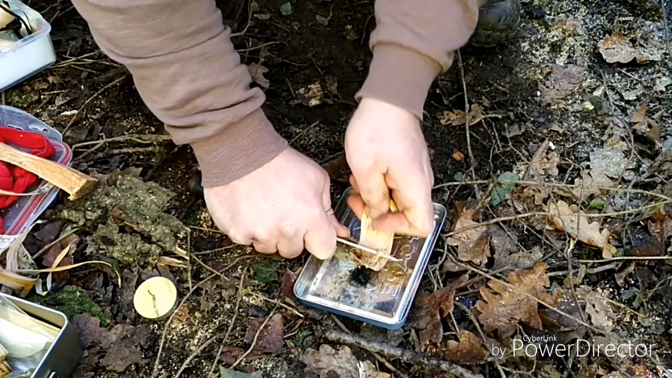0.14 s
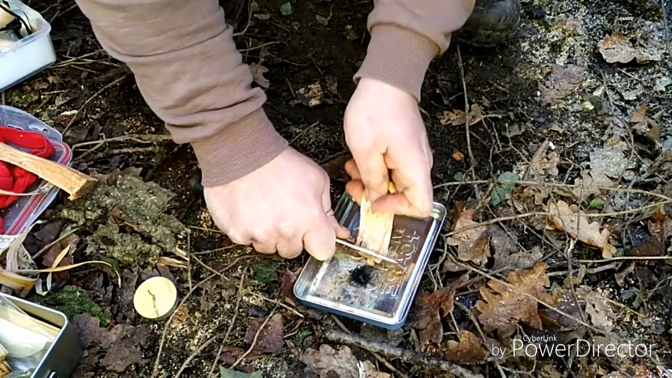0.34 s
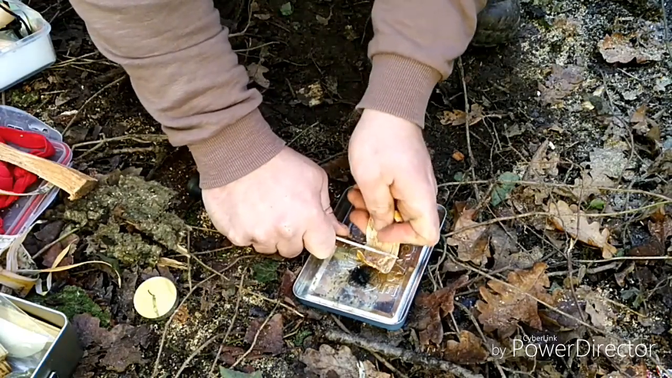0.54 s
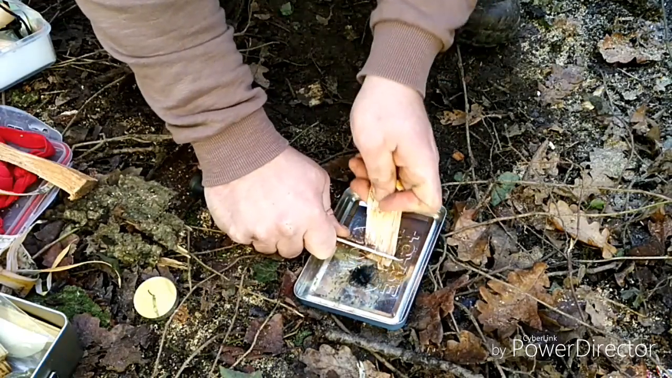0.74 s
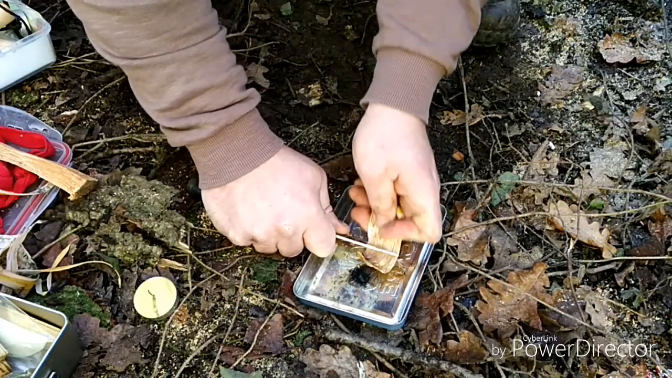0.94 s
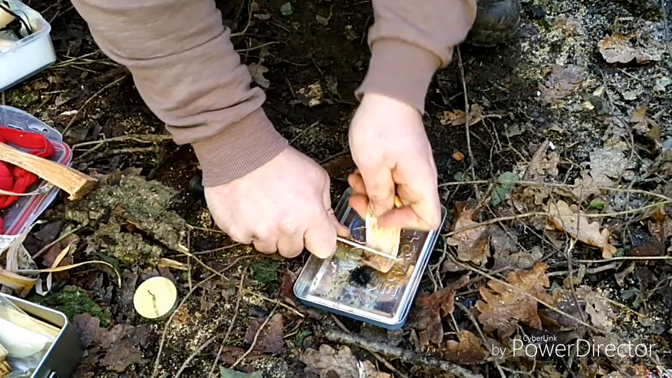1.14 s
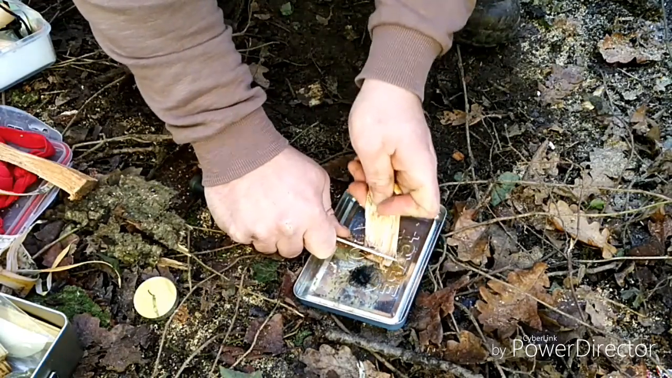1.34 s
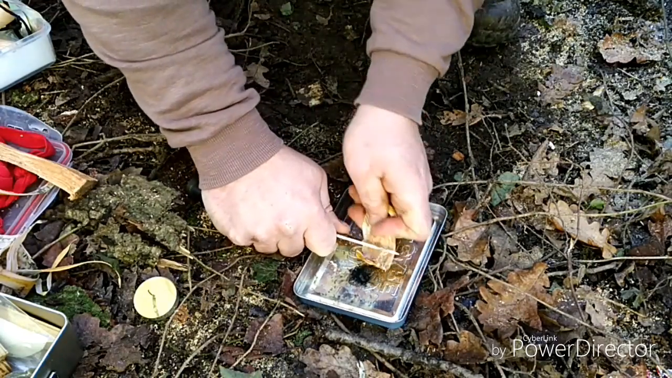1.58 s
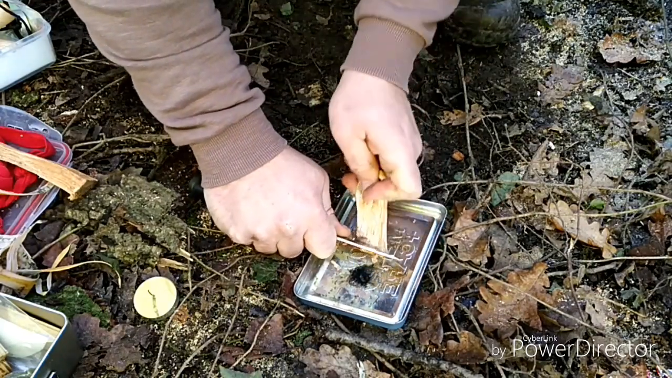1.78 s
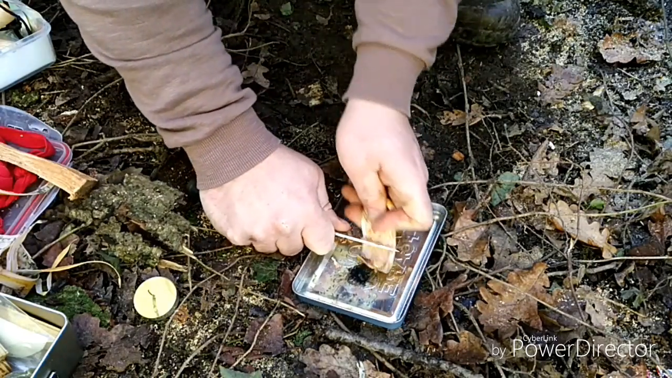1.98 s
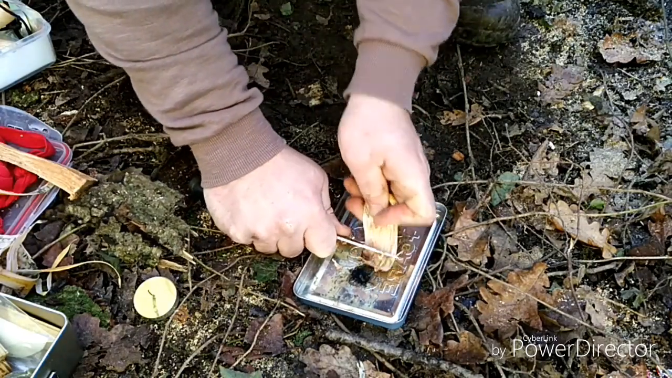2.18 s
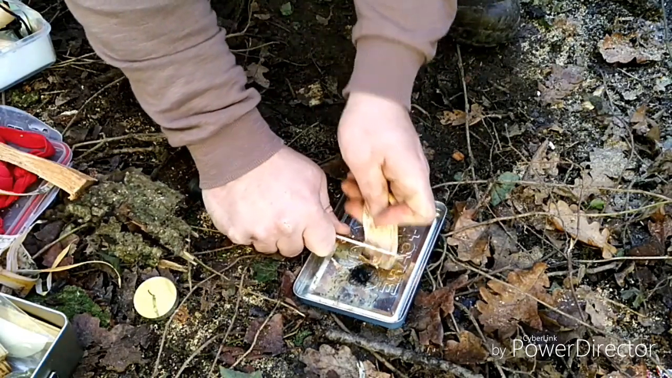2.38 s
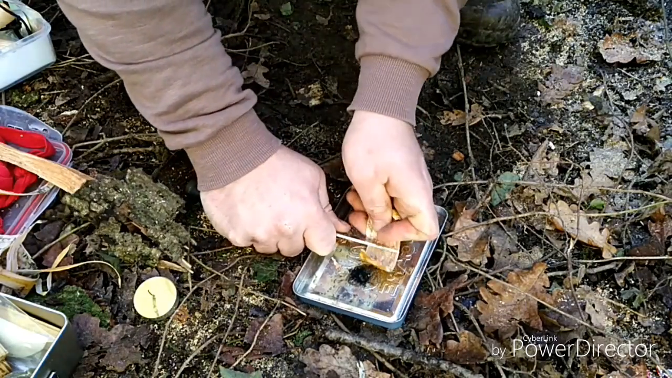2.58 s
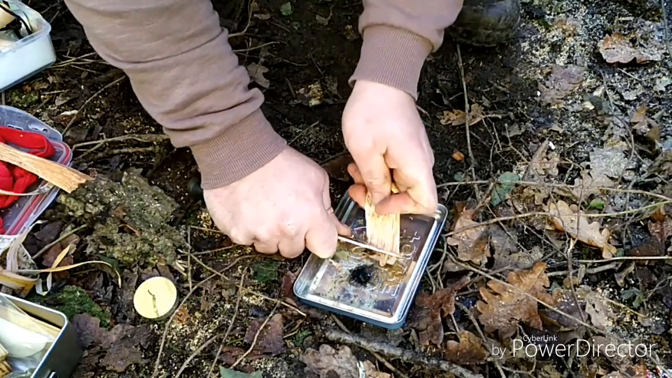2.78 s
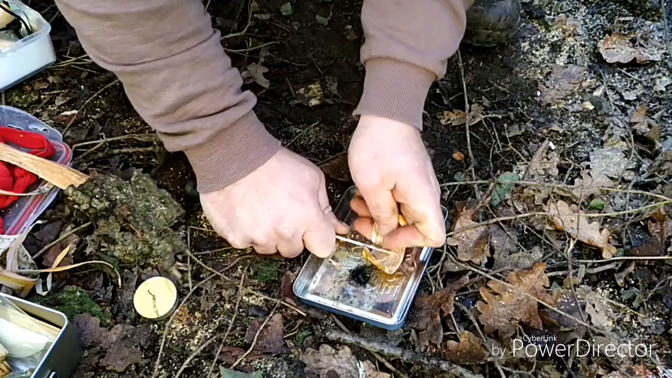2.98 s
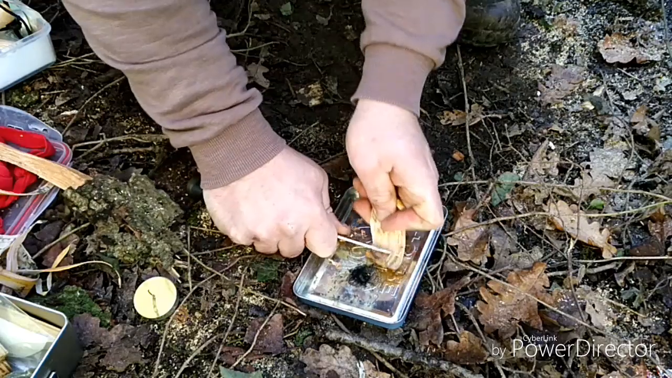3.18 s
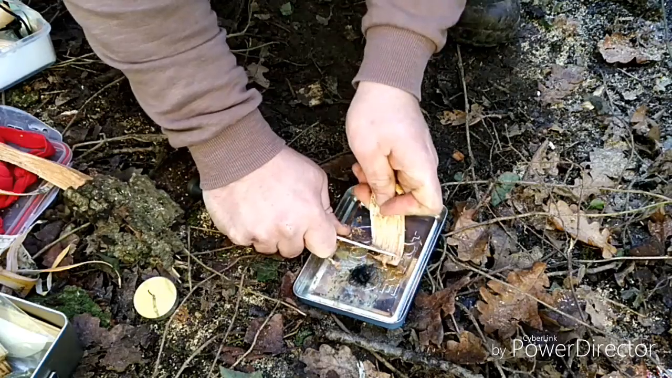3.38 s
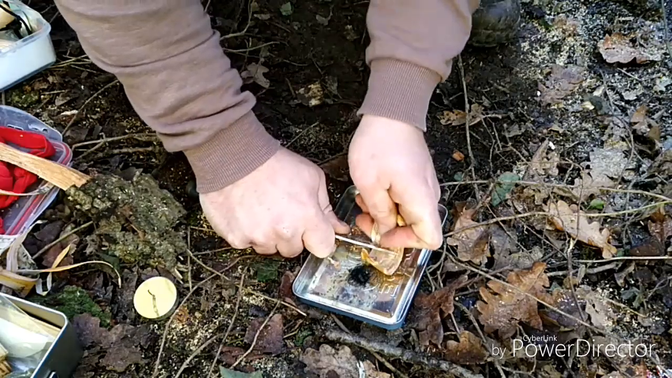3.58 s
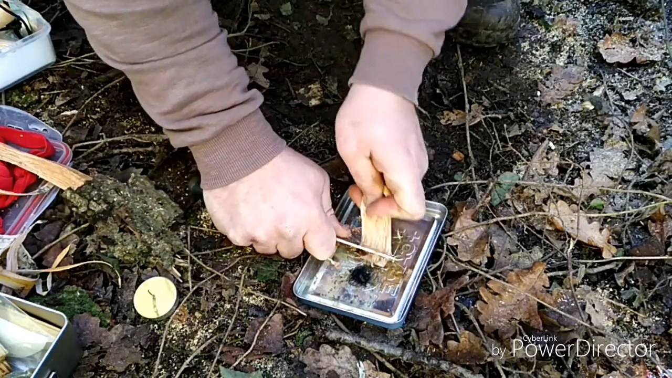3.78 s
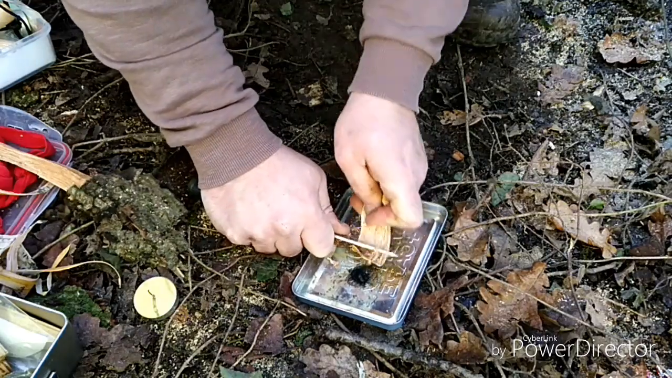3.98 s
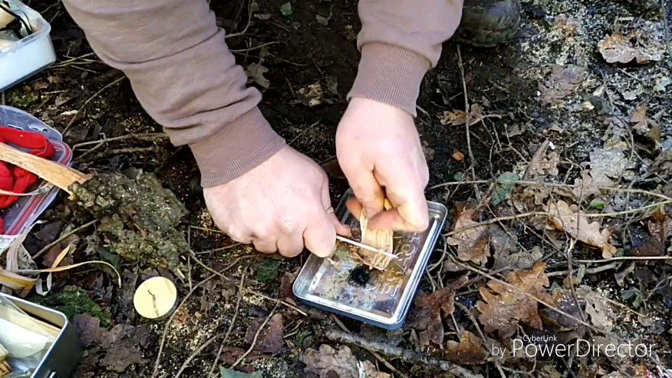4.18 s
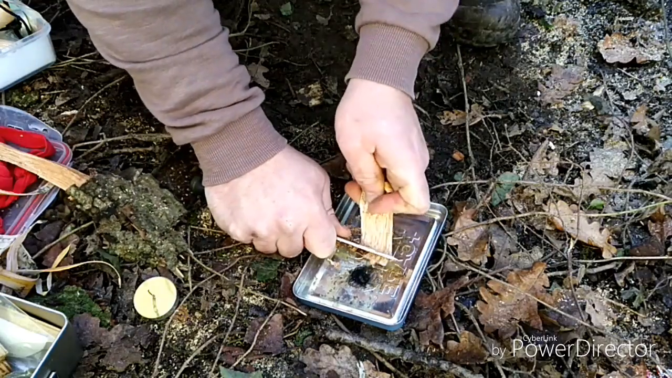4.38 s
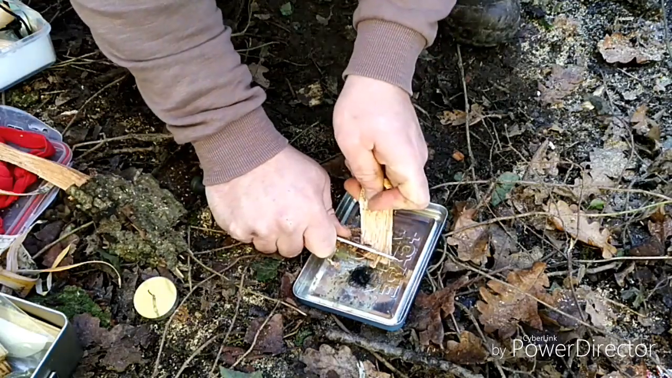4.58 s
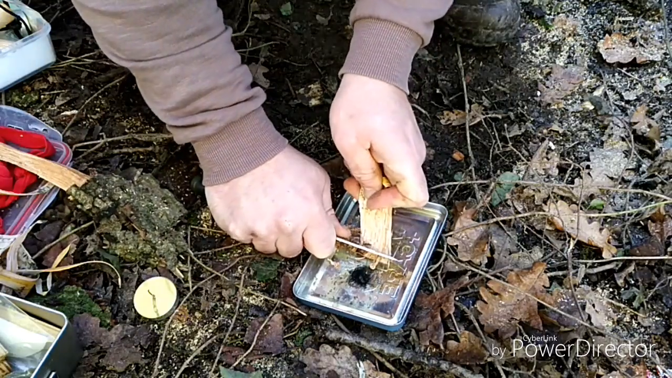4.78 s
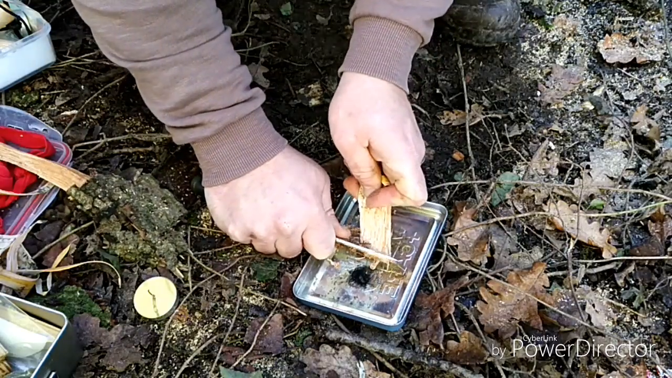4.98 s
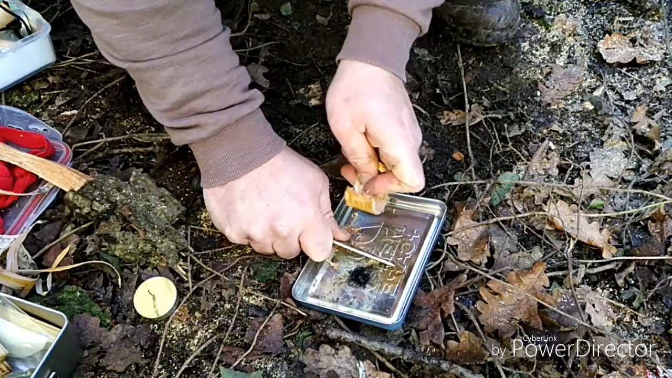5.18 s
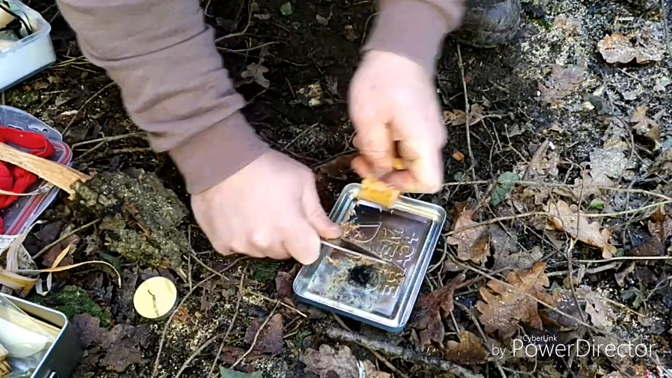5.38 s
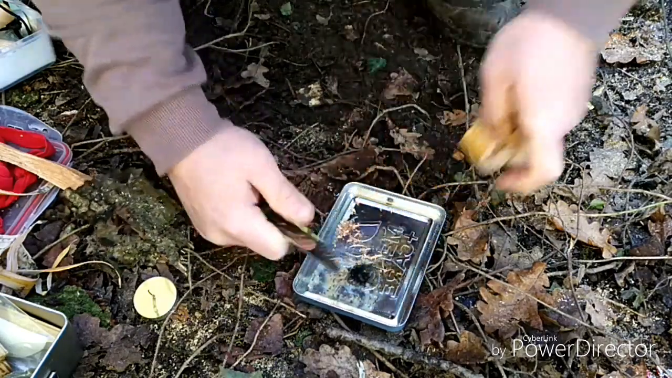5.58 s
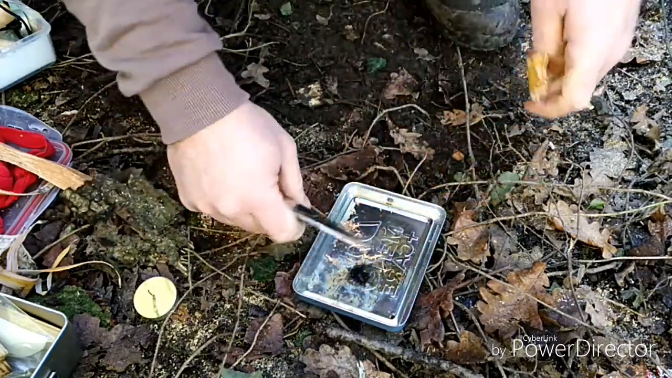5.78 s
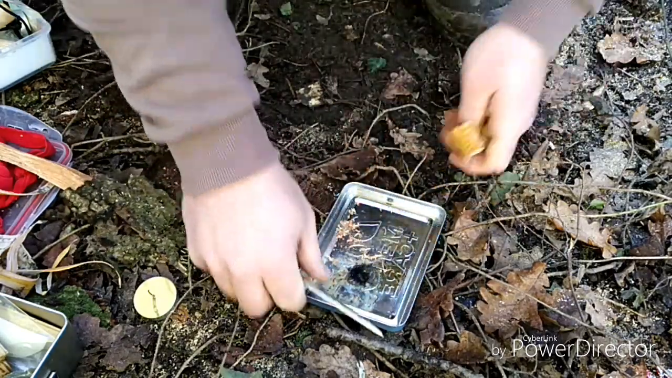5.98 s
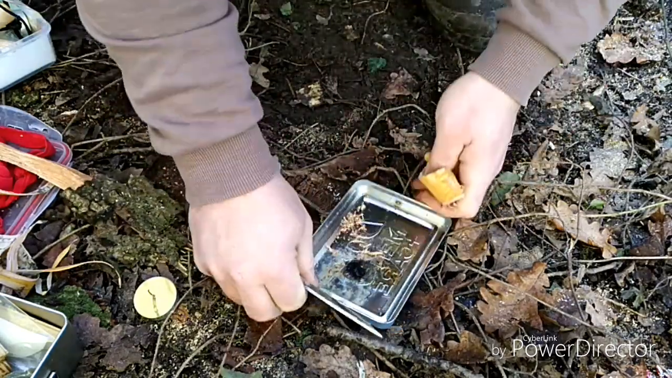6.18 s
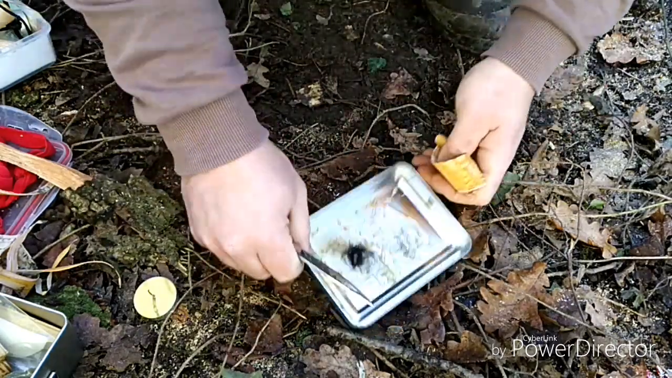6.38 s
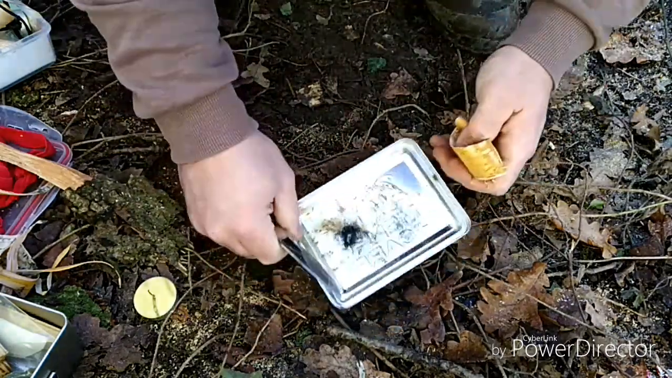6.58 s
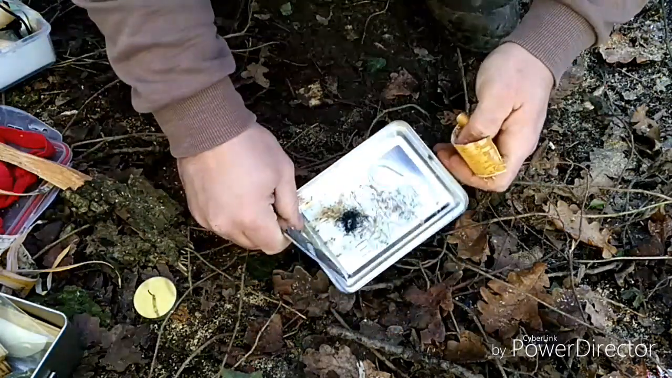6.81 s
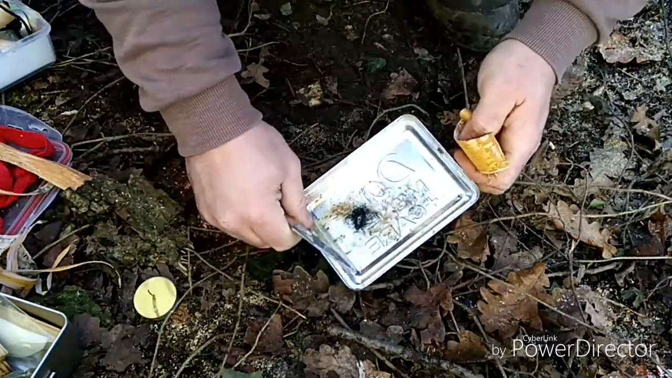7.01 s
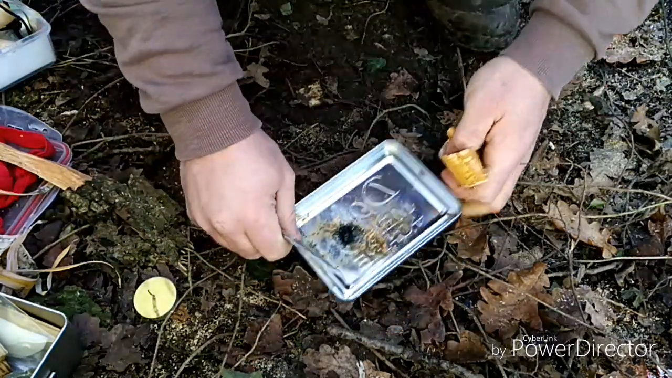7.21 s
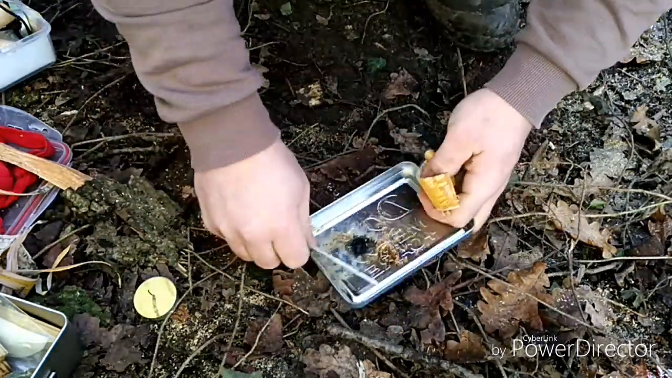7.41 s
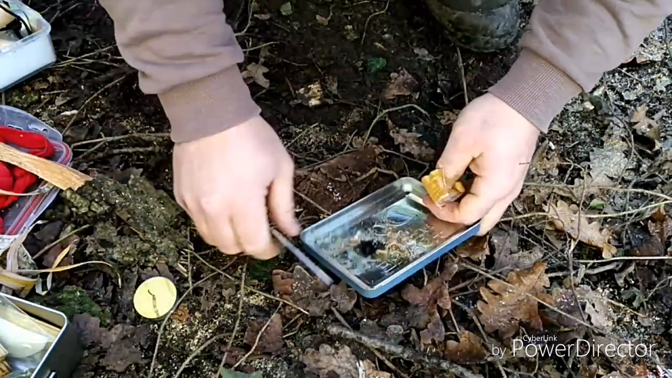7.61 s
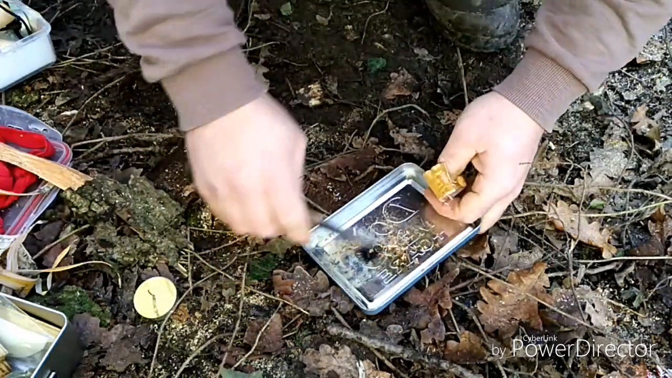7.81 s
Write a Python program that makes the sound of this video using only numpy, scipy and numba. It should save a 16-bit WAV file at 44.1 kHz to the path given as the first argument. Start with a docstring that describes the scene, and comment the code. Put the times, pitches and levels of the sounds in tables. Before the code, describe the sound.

A close, dry stereo pickup on still woodland ground, with very faint hiss and low rumble. From 0 to 4.6 seconds a steel edge is worked along a fire-starting rod: nine pushes about half a second apart, beginning near 0.25. Each is a gritty rasp with stick-slip chatter and a hollow resonance sliding down; the returns hiss more lightly. A sharp catch and knock come at 0.4, a very loud bright clack at 1.57, and the most jagged pushes at about 2.9 and 3.4. Lighter scraping ends near 4.6 with dull bumps. Separate clacks follow at 4.8 and 4.95, then one short scrape at 5.2. Afterwards it is much quieter: patchy dry-leaf rustle, soft tin rubbing and light touches around 6.3, a soil grind at 6.65, a small knock and dull thud at 7.6, then a faint tin touch at 7.7.

```python
"""Fire steel over a tin

A steel edge is worked to and fro along a fire-starting rod, twice a second, over a tin on a woodland floor.
Each push is gritty noise through the steel's resonances, with stick-slip jolts and a hollow resonance sliding
down; the returns and one short late scrape hiss more lightly. Knocks are decaying noise bursts. Later the hands
shift the tin on dry leaves: patchy crackle, grinding, narrow-band rubs and decaying tin modes, over faint air
and hums."""
import sys
import numpy as np
from scipy import signal
from scipy.fft import rfft, irfft
from scipy.io import wavfile
from scipy.ndimage import uniform_filter1d
from numba import njit

SR = 44100
rng = np.random.default_rng(int(sys.argv[2]) if len(sys.argv) > 2 else 0)


def waveform_to_disk(signal):
    """Save audio, clipped to [-1, 1], as 16-bit WAV at the path in sys.argv[1]."""
    frames = np.transpose(np.atleast_2d(signal))
    scaled = np.clip(frames, -1, 1) * 32767
    samples = np.round(scaled).astype(np.int16)
    wavfile.write(sys.argv[1], SR, samples)


N = 346185


def from_db(db):
    """Decibels to amplitude gain."""
    return 10 ** (np.asarray(db) / 20)


def rms_one(x):
    """Scale to unit rms."""
    return x / np.sqrt(np.mean(x ** 2) + 1e-20)


def colour(x, spectrum, peaks=(), unit_power=True):
    """Causal (minimum-phase) filter from a smooth spectrum plus resonance peaks (Hz, width Hz, dB)."""
    size = 4096
    hz = np.fft.rfftfreq(size, 1 / SR) + 1
    at_hz, at_db = np.transpose(spectrum)
    smooth_db = np.interp(np.log(hz), np.log(at_hz), at_db)
    peaks_db = sum(db / (1 + (2 * (hz - centre) / width) ** 2) for centre, width, db in peaks)
    gain = from_db(smooth_db + peaks_db)
    # folding the cepstrum onto positive time gives minimum phase
    cepstrum = irfft(np.log(rms_one(gain) if unit_power else gain))
    cepstrum[1:size // 2] *= 2
    cepstrum[size // 2 + 1:] = 0
    impulse = irfft(np.exp(rfft(cepstrum)))
    return signal.oaconvolve(x, impulse[None], axes=1)[:, :N]


# Stereo width. Each row: frequency in Hz, side level re mid in dB.
SIDE_WIDTH = [(60, -16), (500, -12), (1500, -9), (2500, -8), (3400, -11), (4700, -2), (5600, -6), (6500, 0),
              (7200, -3), (7800, 1), (8700, -4), (15000, -2)]


def noise():
    """Unit-rms stereo noise, nearly alike in both ears in the bass and wide in the treble."""
    mid, side = rng.standard_normal((2, 1, N))
    side = colour(side, SIDE_WIDTH, unit_power=False)
    return rms_one(mid + side * [[1], [-1]])


def wander(per_s):
    """Random curve of spread about 1: straight lines between normal draws."""
    knots = rng.standard_normal(2000)
    return np.interp(np.arange(N) / SR * per_s, np.arange(len(knots)), knots)


def strikes(times_s, gains):
    """One impulse per event."""
    out = np.zeros(N)
    np.add.at(out, (np.asarray(times_s) * SR).astype(int), gains)
    return out


def fade(energy, t60_s):
    """Energy that dies away exponentially."""
    return signal.lfilter([1], [1, -from_db(-120 / (t60_s * SR))], energy + 1e-18)


def burst(times_s, db, crack_t60, tail_t60, tail_db):
    """Envelope of sharp cracks, each with an added tail (t60 in s, tail level re crack)."""
    energy = strikes(times_s, from_db(db) ** 2)
    crack, tail = fade(energy, crack_t60), fade(energy, tail_t60)
    return np.sqrt(crack + from_db(tail_db) ** 2 * tail)


def grit(per_s, spread_db, t60, smooth_db):
    """Unit-rms envelope of tiny fractures of uneven size over smooth friction."""
    sizes = from_db(spread_db * np.clip(rng.standard_normal(N), -2, 2))
    fractures = rng.random(N) < per_s / SR
    energy = fade(fractures * sizes ** 2, t60)
    return rms_one(np.sqrt(energy / energy.mean() + from_db(smooth_db) ** 2))


@njit
def sliding_resonance(x, hz, q):
    """State-variable band-pass with a moving centre; noise keeps its power."""
    out, low, band = np.zeros(len(x)), 0., 0.
    for i in range(len(x)):
        step = 2 * np.sin(np.pi * hz[i] / SR)
        low += step * band
        band += step * (x[i] - low - band / q)
        out[i] = band / np.sqrt(q * hz[i] * np.pi / SR)
    return out


def resonate(x, hz, q):
    """Both channels through one moving resonance."""
    hz = np.clip(hz, 200, 10000)
    return np.array([sliding_resonance(channel, hz, q) for channel in x])


LIFT_S = 0.0076  # contact ramp just outside each span


def swell(t, start, peak, end, depth_db, rise_power, fall_power):
    """Gain of one hand movement: rises to 1, eases to -depth_db at its ends, then lifts off to silence."""
    rise = np.clip((peak - t) / (peak - start), 0, 1)
    fall = np.clip((t - peak) / (end - peak), 0, 1)
    contact = np.clip(1 + np.minimum(t - start, end - t) / LIFT_S, 0, 1)
    return contact * from_db(-depth_db * (rise ** rise_power + fall ** fall_power))


def swells(rows, column, depth_db, rise_power, fall_power):
    """Envelope of a table of movements, each at the level in the given column."""
    out = np.zeros(N)
    for row in rows:
        first = max(int((row[0] - LIFT_S) * SR), 0)
        last = min(int((row[2] + LIFT_S) * SR), N)
        at = np.arange(first, last)
        out[at] += from_db(row[column]) * swell(at / SR, *row[:3], depth_db, rise_power, fall_power)
    return out


# Air hiss spectrum. Each row: frequency in Hz, relative density in dB.
AIR_SPECTRUM = [(120, -20.5), (200, -1), (249, 4), (548, -4), (777, -3), (1560, -9.5), (3070, -8),
                (4600, -11.5), (6640, -5.5), (7830, -7), (9230, -8.5), (10500, -11.5), (14900, -10.5),
                (16000, -21.5)]
# Low rumble spectrum, also shapes the shudder. Each row: frequency in Hz, relative density in dB.
RUMBLE_SPECTRUM = [(12, -71), (20, -36), (24, -25), (35, -21), (64, 3), (118, -2.5), (145, -4), (195, -10),
                   (236, -12.5), (300, -22.5), (390, -51), (660, -120)]
# Low hums. Each row: start in seconds, end in seconds, mean frequency in Hz, nominal peak level in dB.
LOW_HUMS = [(0.02, 0.41, 73, -49), (1.201, 5.6, 158, -64), (5.5, 6.3, 118, -56)]
AIR_DB, RUMBLE_DB = -59, -57


def woodland():
    """Still air: faint hiss over a far rumble; sine hums swell and fade, wavering in pitch and level."""
    hiss = from_db(AIR_DB) * colour(noise(), AIR_SPECTRUM)
    rumble = from_db(RUMBLE_DB) * colour(noise(), RUMBLE_SPECTRUM)
    out = hiss + rumble
    t = np.arange(N) / SR
    for start, end, hz, db in LOW_HUMS:
        arch = np.sin(np.pi * np.clip((t - start) / (end - start), 0, 1))
        level = from_db(db + 3 * wander(18))
        phase = 2 * np.pi * np.cumsum(hz * (1 + .04 * wander(20))) / SR
        out = out + level * arch * np.sin(phase)
    return out


def hollow(envelope, top_hz, low_hz, bottom_hz, q, overtone_db):
    """The resonance falls as the contact travels out on a push and climbs again on a light stroke."""
    path = [(0, bottom_hz), (4.6, bottom_hz)]
    for start, peak, end, *_, middle_hz in PUSH_STROKES:
        path += zip((start, peak, (peak + end) / 2, end), (top_hz, middle_hz, low_hz, bottom_hz))
    for start, _, end, *_ in LIGHT_STROKES:
        path += zip(np.linspace(start, end, 4), (bottom_hz, low_hz, top_hz, top_hz))
    hz = np.interp(np.arange(N) / SR, *np.transpose(sorted(path)))
    wobble = np.exp(.06 * wander(60))
    hz = np.maximum(hz * wobble, 470)
    drive = envelope * noise()
    overtones = resonate(drive, hz * 1.577, 9.4) - from_db(-3.5) * resonate(drive, hz * 2.04, 5.9)
    ringing = resonate(drive, hz, q) - from_db(overtone_db) * overtones
    band = signal.butter(4, [390, 2600], "band", fs=SR, output="sos")
    return signal.sosfilt(band, ringing)


PUSH_DEPTH_DB, PUSH_RISE_POWER, PUSH_FALL_POWER = 19, 2.5, 1.22
CHATTER_FOLLOWS = 1.01  # dB per dB of pressure
CHATTER_SLOWING_PER_S, CHATTER_JITTER, CHATTER_SPREAD_DB = 2.2, 0.104, 2


def chatter(hollow_db):
    """Stick-slip jolts follow the pressure and slow along a push; a hard catch restarts the cycle."""
    slips, catches = [], np.array(HARD_CATCHES)[:, 0]
    for start, peak, end, _, _, db, gap_s, _ in PUSH_STROKES:
        s = start
        for early, strong in rng.standard_normal((60, 2)):
            gap = gap_s * np.exp(CHATTER_SLOWING_PER_S * (s - peak) + CHATTER_JITTER * early)
            ahead = catches[(catches > s) & (catches < s + 1.6 * gap)]
            s = ahead.min() if len(ahead) else s + gap
            if s > end:
                break
            if not len(ahead):
                pressure = swell(s, start, peak, end, PUSH_DEPTH_DB, PUSH_RISE_POWER, PUSH_FALL_POWER)
                pressure_db = 20 * np.log10(pressure)
                slip_db = db + CHATTER_FOLLOWS * pressure_db + CHATTER_SPREAD_DB * strong
                slips.append((s, slip_db, hollow_db))
    return slips


def treble_band(envelope, times_s):
    """Narrow-band treble noise around 7.6 kHz follows the jolts; its centre is drawn at random for each slip."""
    centres_hz = 7600 * np.exp(.11 * rng.standard_normal(1000))
    slip_index = np.searchsorted(times_s, np.arange(N) / SR + .001)
    return resonate(envelope * noise(), centres_hz[slip_index], 16.)


def reflections(x):
    """Sound bounces off the moving hands and the tin; the shifting paths keep changing its colour."""
    out, now = x, np.arange(N)
    for delay_s, sway, share in [(.0006, .25, .4), (.0017, .1, -.35), (.0036, .04, .25)]:
        late = now - delay_s * SR * (1 + sway * wander(14))
        out = out + share * np.array([np.interp(late, now, channel) for channel in x])
    return out


# Pushes. Each row: start, hardest moment and end in seconds, drive levels of rasp, hollow resonance
# and chatter in dB, nominal slip gap at the hardest in seconds, nominal resonance there in Hz.
PUSH_STROKES = [(0.234, 0.366, 0.47, -41, -37.5, -41, 0.015, 565),
                (0.744, 0.845, 0.94, -37, -36, -30, 0.013, 600),
                (1.26, 1.31, 1.485, -40, -39, -25, 0.012, 860),
                (1.75, 1.828, 1.967, -36.5, -37.5, -30, .011, 706),
                (2.291, 2.383, 2.437, -37, -38.5, -30, .009, 595),
                (2.754, 2.885, 2.93, -42.5, -36, -19.5, 0.0099, 600),
                (3.265, 3.366, 3.475, -40.5, -52, -19.5, .012, 697),
                (3.795, 3.875, 4.06, -42.5, -39.5, -31, .012, 750),
                (4.296, 4.381, 4.565, -40, -44, -36, .011, 616)]
# Light strokes: the returns, and one short late scrape.
# Each row: start, bite and end in seconds, drive levels of rasp and hollow resonance in dB.
LIGHT_STROKES = [(-0.03, 0.098, 0.23, -43, -58), (0.506, 0.571, 0.75, -42.5, -51),
                 (0.996, 1.051, 1.22, -45, -40.5), (1.567, 1.584, 1.69, -38, -67),
                 (2.028, 2.088, 2.24, -42, -44.5), (2.518, 2.549, 2.703, -41.5, -60),
                 (3.028, 3.058, 3.186, -40.5, -40), (3.567, 3.597, 3.72, -41.5, -40.5),
                 (4.049, 4.129, 4.285, -44.5, -46.5), (5.152, 5.213, 5.26, -42.5, -44)]
# The edge catches and jumps free. Each row: time in seconds, drive level in dB, hollow re that level in dB.
HARD_CATCHES = [(0.08, -29.5, -4.5), (0.3933, -14.5, -12), (0.408, -20.5, -8.5), (0.4174, -22, -6),
                (0.4425, -34, 1), (0.5798, -24, -29), (0.881, -22, -3.5), (0.8993, -22.5, -5.5),
                (0.9512, -23, -5), (1.266, -32, -9), (1.297, -25.5, -8), (1.3162, -18.5, -24),
                (1.3548, -20, -15), (1.3782, -22, -7), (1.4137, -19.5, 1), (1.4335, -20.5, -2),
                (1.7335, -33.5, -34), (1.8453, -18.5, -5.5), (1.872, -22.5, -5), (1.891, -23.5, -15),
                (2.083, -26.5, -11), (2.5287, -32.5, -13), (2.8385, -20, -7), (2.8877, -12.5, -20),
                (2.9079, -17, -12), (2.9202, -15, -9), (3.052, -24, -12), (3.1453, -32.5, -35),
                (3.3064, -20.5, -14), (3.3222, -14.5, -13), (3.3541, -15, -8), (3.3806, -14, -11),
                (3.3976, -11.5, -8), (3.4057, -17.5, -6.5), (3.4273, -20, -8), (3.451, -19, -11),
                (3.4687, -20, -5.5), (3.9735, -17, -13), (4.002, -21, -12), (4.4299, -14.5, -25),
                (4.4503, -28, -2), (4.5586, -25.5, -2), (4.589, -30.5, -2.5), (5.1632, -25, -15),
                (5.2008, -26, -15), (5.214, -19.5, -23)]
# Rod and blade resonances; knocks rescale them. Each row: frequency in Hz, width in Hz, boost in dB.
STEEL_RESONANCES = [(442, 53, 6), (1266, 130, 7), (1977, 245, 10), (2342, 440, 9.5), (2700, 170, 3),
                    (3088, 164, 7.5), (3980, 390, 6), (8000, 160, -2), (8750, 250, 2), (9550, 110, 7)]
# Rasp spectrum. Each row: frequency in Hz, relative density in dB.
RASP_SPECTRUM = [(100, -29), (350, -12), (700, 1), (1300, -5), (1800, -15), (3000, -6.5), (4700, -8.5),
                 (6000, -1), (7000, -1.5), (8500, -4), (10000, -7.5), (12500, -10), (16000, -19.5)]
HOLLOW_FOLLOWS = 1.36  # dB per dB of pressure
LIGHT_DEPTH_DB, LIGHT_RISE_POWER, LIGHT_FALL_POWER = 23.5, 1.02, 1.48
BITE_DEPTH_DB, BITE_RISE_POWER, BITE_FALL_POWER = 39, 1.2, 0.28


def scraping():
    """Gritty friction and stick-slip jolts excite the steel and the hollow resonance together."""
    push_grit = grit(per_s=260, spread_db=3, t60=.009, smooth_db=-1)
    light_grit = grit(per_s=640, spread_db=8, t60=0.0031, smooth_db=3.0)
    s, db, hollow_db = np.transpose(list(HARD_CATCHES) + chatter(hollow_db=-14.5))
    snap = burst(s, db, crack_t60=.006, tail_t60=.035, tail_db=-11)
    jolts = from_db(-3.5) * uniform_filter1d(snap, size=30)

    push_rasp = push_grit * swells(PUSH_STROKES, column=3, depth_db=PUSH_DEPTH_DB,
                                   rise_power=PUSH_RISE_POWER, fall_power=PUSH_FALL_POWER)
    light_rasp = light_grit * swells(LIGHT_STROKES, column=3, depth_db=LIGHT_DEPTH_DB,
                                     rise_power=LIGHT_RISE_POWER, fall_power=LIGHT_FALL_POWER)
    bright = np.linalg.norm([push_rasp, light_rasp, jolts], axis=0)  # powers add
    rasp = colour(bright * noise(), RASP_SPECTRUM, STEEL_RESONANCES)

    push_hollow = push_grit * swells(PUSH_STROKES, column=4, depth_db=PUSH_DEPTH_DB * HOLLOW_FOLLOWS,
                                     rise_power=1.86, fall_power=1.7)
    light_hollow = light_grit * swells(LIGHT_STROKES, column=4, depth_db=BITE_DEPTH_DB,
                                       rise_power=BITE_RISE_POWER, fall_power=BITE_FALL_POWER)
    hollow_jolts = burst(s, db + hollow_db, crack_t60=0.01, tail_t60=0.045, tail_db=-4)
    dull = np.linalg.norm([push_hollow, light_hollow, hollow_jolts], axis=0)
    body = hollow(dull, top_hz=1230, low_hz=506, bottom_hz=473, q=3.27, overtone_db=-7.5)

    treble = treble_band(from_db(-14.5) * jolts, np.sort(s))
    return reflections(rasp + body + treble)


SHAKE_DB = -28.5  # re chatter


def shudder():
    """Low shudder of the hands while the edge chatters: rumble-shaped noise under each push."""
    envelope = swells(PUSH_STROKES, column=5, depth_db=PUSH_DEPTH_DB,
                      rise_power=PUSH_RISE_POWER, fall_power=PUSH_FALL_POWER)
    return from_db(SHAKE_DB) * colour(envelope * noise(), RUMBLE_SPECTRUM)


# Hard knocks. Each row: nominal time in seconds, nominal level in dB, tail t60 in seconds,
# ping frequency in Hz, broad body boost around 1.8 kHz in dB.
STEEL_KNOCKS = [(0.387, -16, 0.045, 6990, -7), (1.057, -24.5, 0.032, 7100, -7),
                (1.5724, -8.5, 0.041, 6830, -1), (4.0707, -34, 0.039, 6900, -40),
                (4.121, -22.5, 0.011, 6470, -27), (4.788, -23, 0.037, 7290, -8.5),
                (4.9442, -18.5, 0.045, 5590, -19.5), (7.5913, -35, 0.027, 6430, -4)]
# Knock spectrum. Each row: frequency in Hz, relative density in dB.
KNOCK_SPECTRUM = [(100, -26), (300, -13), (700, -0.5), (1300, -9), (2000, -5.5), (4700, -9.5), (6500, -7.5),
                  (8000, -5.5), (10000, -5.5), (16000, -24)]


def clacks():
    """Hard knocks ring the steel more sharply; where they land sets their ping and their body."""
    out, grain = 0, noise()
    for s, db, ring_s, ping_hz, body_db in STEEL_KNOCKS:
        envelope = burst([s + 0.00053], [db - 3.0], crack_t60=0.0019, tail_t60=ring_s, tail_db=-4.5)
        envelope = uniform_filter1d(envelope, size=30)
        sharp_steel = [(hz, width * 0.29, gain * 1.27) for hz, width, gain in STEEL_RESONANCES]
        peaks = sharp_steel + [(ping_hz, 800, 7), (1800, 3000, body_db)]
        out = out + colour(envelope * grain, KNOCK_SPECTRUM, peaks)
    return out


# Bumps of hand and tin on the ground. Each row: time in seconds, nominal level in dB.
GROUND_BUMPS = [(4.552, -37), (4.598, -31.5), (5.163, -36), (5.211, -34), (7.21, -44), (7.596, -30)]
# Thud spectrum. Each row: frequency in Hz, relative density in dB.
THUD_SPECTRUM = [(30, -14), (110, 2.5), (240, 5), (450, -1.5), (800, -12.5), (2000, -20), (16000, -59)]


def bumps():
    """Dull thuds deadened by the soil: low noise bursts with short tails."""
    s, db = np.transpose(GROUND_BUMPS)
    envelope = burst(s, db - 6.5, crack_t60=0.038, tail_t60=0.064, tail_db=-1.0)
    return colour(envelope * noise(), THUD_SPECTRUM)


# Sleeves on dry leaves. Each row: start, loudest and end in seconds, nominal level in dB.
LEAF_BRUSHES = [(4.62, 4.83, 4.95, -58.5), (5.22, 5.28, 5.52, -59.5), (5.47, 5.53, 6.14, -58.5),
                (6.15, 6.33, 6.5, -55.5), (6.5, 6.75, 7.32, -58.5), (6.9, 7.0, 7.4, -72.5),
                (7.38, 7.52, 8.24, -58.5)]
# Rustle spectrum. Each row: frequency in Hz, relative density in dB.
RUSTLE_SPECTRUM = [(150, 1.5), (250, -34), (354, -10), (629, -10), (698, -1), (938, -16.5), (1160, -10),
                   (3010, -8), (7840, -4.5), (14900, -10), (16000, -39)]
RUSTLE_DEPTH_DB, RUSTLE_POWER = 18, 2


def rustle():
    """Sleeves and dry leaves crackle in patches, with a treble swish of wandering pitch."""
    crackle = grit(per_s=130, spread_db=5, t60=.004, smooth_db=3) * from_db(1.5 * wander(30))
    envelope = swells(LEAF_BRUSHES, column=3, depth_db=RUSTLE_DEPTH_DB,
                      rise_power=RUSTLE_POWER, fall_power=RUSTLE_POWER)
    leaves = envelope * crackle * noise()
    swish = from_db(-8) * resonate(leaves, 6500 * np.exp(.2 * wander(14)), 7.)
    return colour(leaves, RUSTLE_SPECTRUM) + swish


# Tin dragged over soil. Each row: start, loudest and end in seconds, level in dB.
TIN_DRAGS = [(6.2, 6.3, 6.45, -61), (6.56, 6.65, 6.79, -50)]
DRAG_DEPTH_DB, DRAG_POWER = 8, 1.35


def drag():
    """The tin grinds softly on the ground: sparse grit through a dull spectrum."""
    envelope = swells(TIN_DRAGS, column=3, depth_db=DRAG_DEPTH_DB, rise_power=DRAG_POWER, fall_power=DRAG_POWER)
    soil = envelope * grit(per_s=80, spread_db=3, t60=.014, smooth_db=-1)
    spectrum = [(80, -16), (380, -2.5), (800, -15), (2500, -17), (6000, -13.5), (16000, -17.5)]
    return colour(soil * noise(), spectrum)


# Fingers and blade on the tin. Each row: start, loudest and end in seconds, level in dB, pitch in Hz.
TIN_RUBS = [(6.2, 6.27, 6.33, -59, 1930), (6.41, 6.457, 6.46, -53.5, 5600), (7.016, 7.202, 7.32, -67, 1620)]
RUB_DEPTH_DB, RUB_Q = 16, 3.5


def rubs():
    """Soft friction rings in a narrow band."""
    out, grain = np.zeros((2, N)), noise()
    for row in TIN_RUBS:
        envelope = swells([row], column=3, depth_db=RUB_DEPTH_DB, rise_power=2, fall_power=2)
        out = out + resonate(envelope * grain + 1e-18, np.full(N, float(row[4])), RUB_Q)
    return out


# Light touches. Each row: time in seconds, nominal level in dB, knock pitch in Hz, hardness in dB.
TIN_TOUCHES = [(6.264, -48.5, 2010, -8.5), (6.333, -55.5, 1000, -14), (6.548, -50.5, 1062, -37),
               (7.685, -50.5, 1880, -2.5)]
# Modes of the tin. Each row: frequency in Hz, relative level in dB, t60 in seconds.
TIN_MODES = [(674, -1.5, 0.82), (1075, 5, 0.14), (1978, 9.5, 0.22), (2260, -4, 0.26), (2950, -1, .15),
             (3640, -8, 0.25)]


def tin():
    """Each touch is a short scratchy knock; the harder ones set the whole tin ringing more strongly."""
    out, grain = 0, noise()
    for s, db, knock_hz, hard_db in TIN_TOUCHES:
        tail_s = 0.19 * from_db(hard_db / 3)
        scratch = burst([s], [db - 6.5], crack_t60=.03, tail_t60=tail_s, tail_db=10.5)
        spectrum = [(300, -52), (1000, -2.5), (2400, hard_db), (6000, hard_db + 3), (16000, hard_db - 39)]
        out = out + colour(scratch * grain, spectrum, [(knock_hz, 130, 13)])
    s, db, _, hard_db = np.transpose(TIN_TOUCHES)
    for hz, mode_db, t60_s in TIN_MODES:
        radius, angle = from_db(-60 / (t60_s * SR)), 2 * np.pi * hz / SR
        hits = strikes(s, from_db(db + 2 * hard_db + mode_db))
        poles = [1, -2 * radius * np.cos(angle), radius * radius]
        out = out + signal.lfilter([0, np.sin(angle)], poles, hits + 1e-18)
    return out


def scene():
    """The work is close and dry; the knocks sit slightly left, the rustle and drag slightly right."""
    work = scraping() * from_db([[.3], [-.3]]) + clacks() * from_db([[1.2], [-1.2]])
    ground = (rustle() + drag()) * from_db([[-.8], [.8]])
    return woodland() + work + shudder() + bumps() + ground + rubs() + tin()


CUTOFF_HZ = 15800


def record(dry):
    """The two microphone ports differ in the treble; the top is cut."""
    left = colour(dry[:1], [(20, 0.36), (16000, 0.09)],
                  [(7130, 1470, 2.27), (8680, 1020, 6.6), (9700, 460, 1.8)], unit_power=False)
    right = colour(dry[1:], [(20, -0.32), (16000, 0.36)],
                   [(7670, 2430, 5.7), (8100, 560, 0.41)], unit_power=False)
    low_pass = signal.ellip(10, .2, 80, CUTOFF_HZ, fs=SR, output="sos")
    return signal.sosfilt(low_pass, np.vstack([left, right]))


dry = scene()
out = record(dry)
waveform_to_disk(out)
```